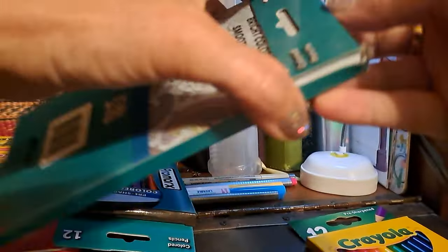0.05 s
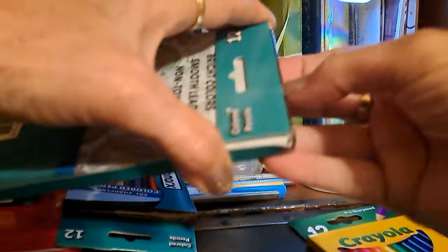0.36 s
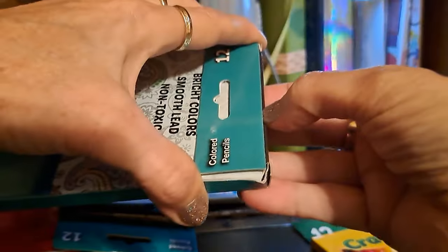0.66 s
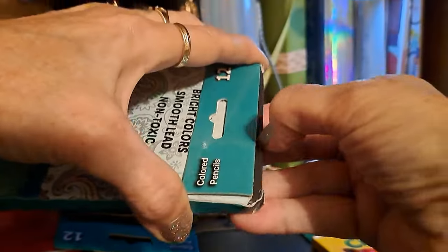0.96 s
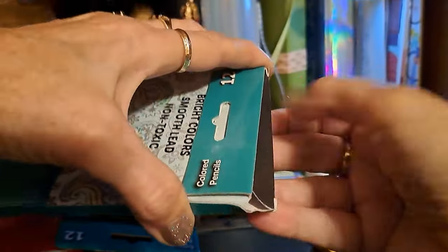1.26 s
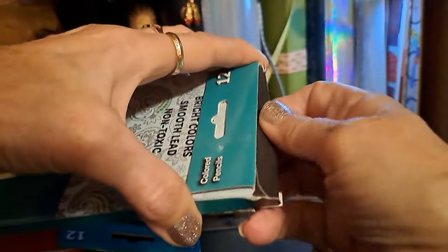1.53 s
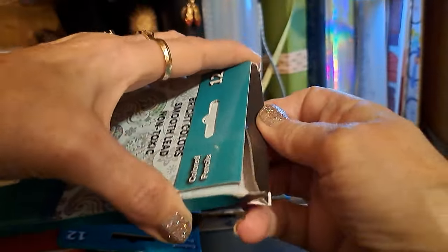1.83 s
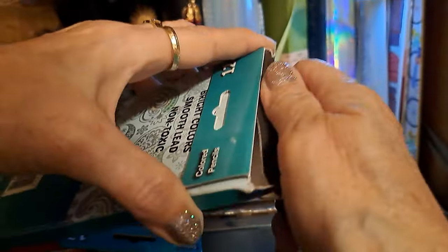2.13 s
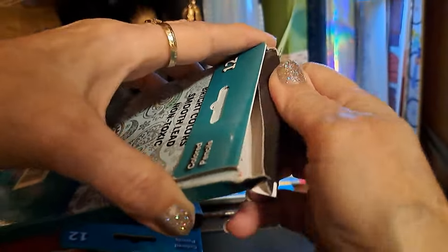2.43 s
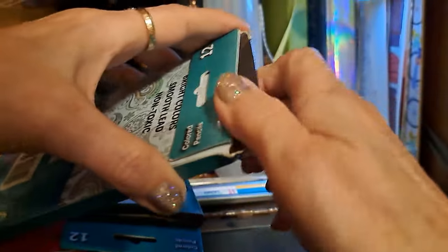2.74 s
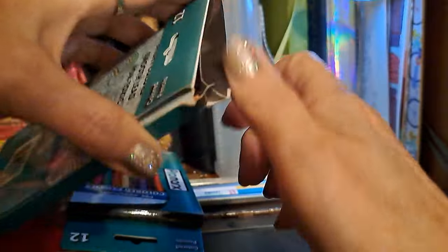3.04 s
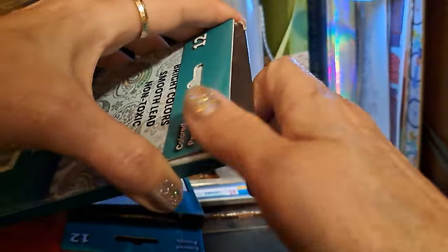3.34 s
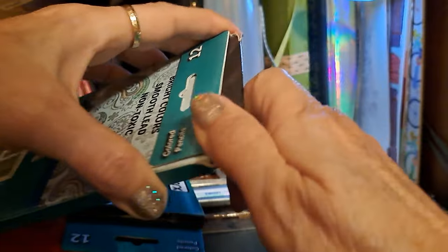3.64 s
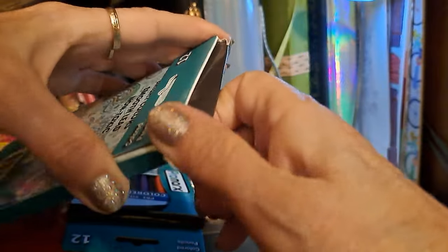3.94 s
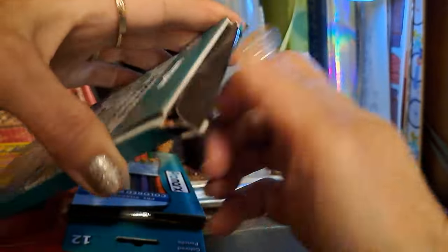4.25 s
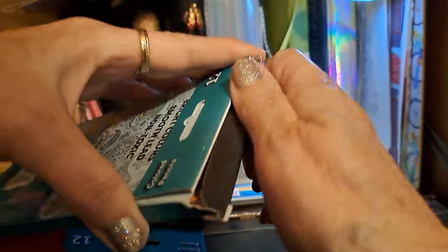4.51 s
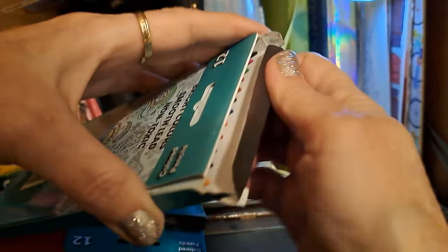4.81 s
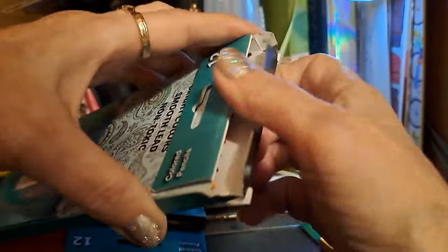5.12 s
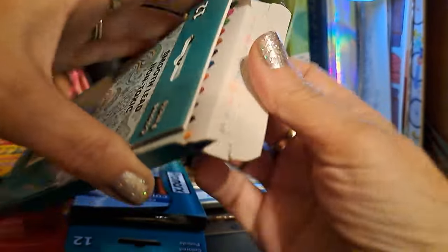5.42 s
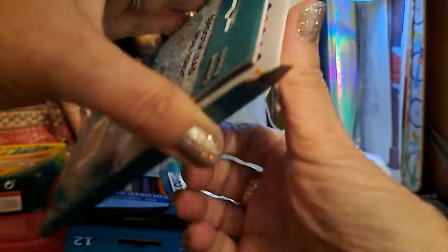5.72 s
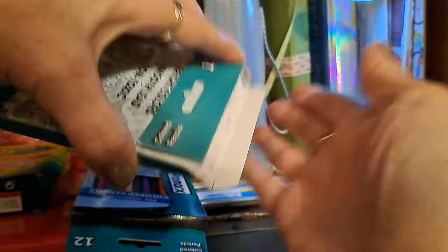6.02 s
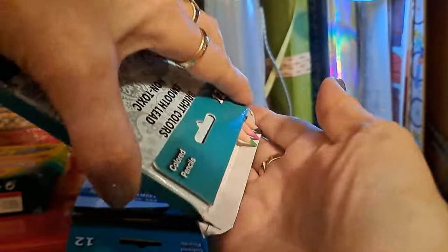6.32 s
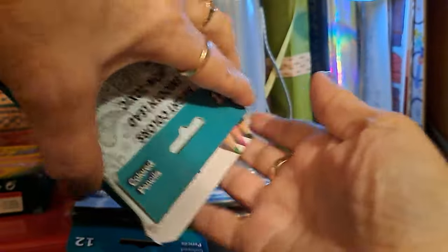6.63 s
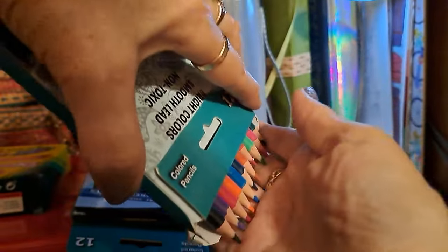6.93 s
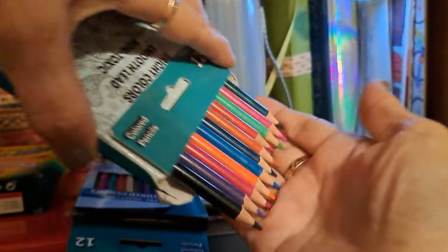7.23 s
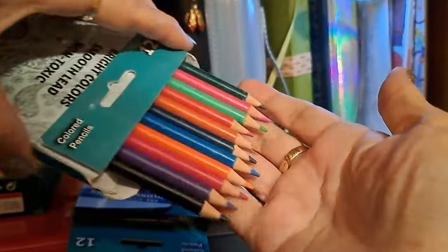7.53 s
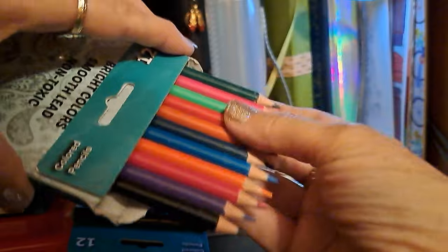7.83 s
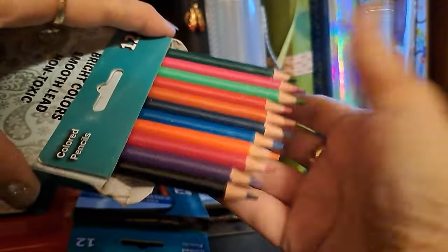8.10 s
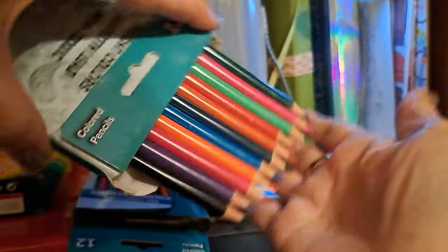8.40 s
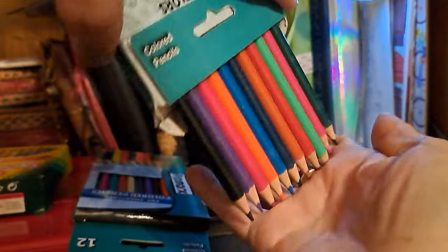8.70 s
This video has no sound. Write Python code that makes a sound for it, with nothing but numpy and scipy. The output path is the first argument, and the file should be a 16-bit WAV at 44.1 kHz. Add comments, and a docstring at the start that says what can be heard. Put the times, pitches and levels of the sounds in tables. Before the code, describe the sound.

In a small, quiet room with a faint mains hum, a thin cardboard box is handled right by the microphone. The card rubs, snaps and thuds softly under the fingers in short, irregular bursts while the flap is pried open. After about six seconds, wooden pencils glide out of the box with a longer, smoother scraping, ending in a few light ticks and bumps.

```python
"""A thin cardboard box, picked open at the end flap close to the microphone; coloured pencils slide out.
Card rubs as fibres catch and release, snaps as patches let go, and thuds under the fingers.
Skin murmurs and squeaks on the print. Pencils scrape along the inside and tick against each other.
Rubs, scrapes and snaps ring the box modes. Small, quiet room with faint mains hum."""
import sys
import numpy as np
from scipy import signal
from scipy.fft import rfft, irfft
from scipy.io import wavfile
from scipy.ndimage import uniform_filter1d

SR = 44100
rng = np.random.default_rng(int(sys.argv[2]) if len(sys.argv) > 2 else 0)


def master(y):
    """Save y as 16-bit WAV."""
    cut = np.clip(np.atleast_2d(y).T, -1, 1)
    pcm = np.round(cut * 32767)  # scale
    wavfile.write(sys.argv[1], SR, pcm.astype(np.int16))


N = 386404
TIME_S = np.arange(N) / SR

# Room air spectrum: (frequency [Hz], gain [dB])
AIR_SPECTRUM = [(20, -27), (35, -6.5), (55, -2.5), (88, -8), (120, -5.5), (170, -10), (240, -13.5),
                (295, -7.5), (380, -21.5), (600, -29), (3000, -35.5), (5000, -39.5), (7500, -34.5),
                (10000, -39), (15000, -33.5)]
# Grip friction envelope: (time [s], level [dB])
GRIP_LEVELS = [(0, -73), (.6, -89), (2.1, -80), (2.4, -59.5), (2.7, -61.5), (2.95, -54.5), (3.15, -74),
               (3.8, -81.5), (4.62, -73.5), (7.3, -72), (8.2, -82.5), (8.76, -74.5)]
# Grip friction spectrum: (frequency [Hz], gain [dB])
GRIP_SPECTRUM = [(100, -18.5), (230, -1.5), (330, 2), (430, 0), (560, -17.5), (900, -32), (2500, -48.5)]
# Finger and flap strokes: (full-speed time [s], rise [s], hold [s], fall [s], relative mid level [dB],
# body re mid [dB], hiss re mid [dB], pinned resonance [Hz], its boost [dB])
CARD_STROKES = [(0.096, 0.13, 0, 0.34, -72.5, -5, -2.5, 1100, 18),
                (0.507, 0.014, 0, 0.049, -70.5, -5, 5, 5300, 7),
                (0.66, 0.087, 0.043, 0.098, -71.5, -5, 0, 2700, 15),
                (1.093, 0.036, 0, 0.1, -36, -10.5, 1.5, 2880, 7),
                (1.137, 0.031, 0.00047, 0.038, -42.5, 4.5, 2, 3670, 16),
                (1.246, 0.071, 0.0083, 0.059, -62.5, -2, -7, 1334, 9),
                (1.459, 0.076, 0.0, 0.17, -53.5, -5.5, 0, 1500, 0),
                (1.573, 0.1, 0.099, 0.22, -65, -8.5, 1.5, 3530, 8.5),
                (1.906, 0.037, 0.055, 0.073, -74, -12.5, 5.5, 2400, 14.5),
                (2.051, 0.018, 0.0079, 0.067, -75, -6, 12.5, 2380, 2),
                (2.168, 0.072, 0.14, 0.11, -64, -18.5, 0, 6100, 7.5),
                (2.408, 0.081, 0, 0.051, -46.5, -5.5, -5, 1196, 7.5),
                (2.578, 0.07, 0.0025, 0.019, -46, 1, 0, 4700, 7),
                (2.605, 0.09, 0.051, 0.13, -62.5, -7, 2, 7050, 4),
                (2.829, 0.06, 0.0, 0.071, -45, -10, -1, 2780, 15),
                (2.89, 0.013, 0.018, 0.024, -36, 4.5, -4, 2450, 13),
                (2.942, 0.047, 0.037, 0.061, -55.5, -13, 0, 1660, -7),
                (3.056, 0.017, 0.044, 0.027, -47, -3, -3.5, 2200, 12),
                (3.263, 0.016, 0.11, 0.079, -74.5, -16.5, 6.5, 5090, 7),
                (3.425, 0.04, 0.0098, 0.071, -50, -22, -1, 2420, 10.5),
                (3.589, 0.02, 0.0, 0.067, -61.5, -13, -0.5, 2470, 8),
                (3.684, 0.021, 0.012, 0.062, -48.5, -0.5, -5, 2460, 4),
                (3.744, 0.021, 0.041, 0.2, -63.5, -12, 5.5, 4100, 6.5),
                (4.082, 0.0076, 0.061, 0.015, -41.5, -9.5, -3.5, 2690, 14),
                (4.212, 0.043, 0.0, 0.082, -49, -10.5, -1, 2310, 7),
                (4.475, 0.021, 0.0089, 0.035, -55, -22, -2, 1950, 9),
                (4.521, 0.013, 0.028, 0.061, -42.5, -12, -2, 2470, 4),
                (4.644, 0.017, 0.0051, 0.04, -55, -4, -20, 1420, 11),
                (4.802, 0.066, 0, 0.027, -37.5, -7, -9, 880, 6),
                (4.825, 0.19, 0.052, 0.068, -47.5, -10.5, 5.5, 4660, 9),
                (4.983, 0.11, 0.051, 0.093, -66.5, -1, -1.5, 3960, 7.5),
                (5.116, 0.02, 0.0098, 0.091, -67.5, -6.5, 4, 3760, 11.5),
                (5.195, 0.015, 0.02, 0.033, -38.5, -4.5, -4.5, 4100, 1.5),
                (5.309, 0.14, 0.021, 0.056, -61.5, -6.5, -1, 1380, 16),
                (5.379, 0.0089, 0.09, 0.12, -57.5, -5.5, -8, 1500, 18.5),
                (5.648, 0.12, 0.012, 0.1, -70.5, -7, 7, 4310, -0.5),
                (5.886, 0.026, 0.0, 0.069, -65, -8, 3, 3580, 9.5)]
# Card spectrum: (frequency [Hz], gain [dB])
CARD_SPECTRUM = [(150, -12), (300, -6.5), (700, -7), (1000, -7), (1200, -5.5), (1500, 6.5), (2500, -1),
                 (4500, -5), (6500, -6), (7800, -6.5), (8500, -14.5), (10000, -14.5), (12500, -8.5),
                 (16000, -18)]
# Panel and cavity modes: (frequency [Hz], bandwidth [Hz], relative gain [dB])
BOX_RESONANCES = [(487, 17, -2.5), (603, 17, -3.5), (820, 130, 3), (909.3, 68, 7), (1410, 28, -4.5),
                  (1670, 19, -13), (1980.4, 210, 4), (2320, 120, -3.5), (2770, 17, -4.5), (3223, 12, -5),
                  (3840, 30, -2), (4078, 28, -3.5), (4480, 86, -1), (7500, 73, -1.5)]
# Body, mid and hiss bands: (low edge [Hz], high edge [Hz])
BANDS_HZ = [(300, 1100), (1100, 3200), (3200, 17000)]
# Skin squeaks: (start [s], end [s], pitch [Hz], level [dB])
SKIN_SQUEAKS = [(0.049, 0.39, 1110, -78), (1.544, 1.775, 957, -71.5), (1.616, 1.827, 1420, -72),
                (4.822, 4.935, 3960, -51.5), (5.281, 5.344, 5580, -69), (5.358, 5.56, 1880, -75)]
# Card snaps, pencil ticks: (time [s], relative mid level [dB], body re mid [dB], hiss re mid [dB],
# pitch [Hz])
SNAP_EVENTS = [(0.389, -75, -10, 3, 3000), (1.0708, -45.5, -23, -18, 2800), (1.1324, -14, -3.5, -2, 944),
               (1.388, -59.5, -24.5, 1.5, 1970), (1.422, -49, -13, -3, 1540),
               (1.4485, -34.5, -7.5, 2, 3060), (1.5191, -45, -5, -0.5, 2420),
               (1.5997, -58.5, -1.5, 7.5, 6350), (2.102, -60.5, -9, -2.5, 2000),
               (2.1466, -59, -20.5, 3, 2500), (2.5183, -44.5, -3.5, 6, 3930),
               (2.5621, -44.5, -10.5, 11.5, 5230), (2.5703, -47, -14, 21, 4580),
               (2.8176, -37.5, -3, 1, 2890), (2.8891, -26.5, -30, 5.5, 2250), (2.947, -37, -7, -14, 1610),
               (2.9969, -37, 0, -14, 980), (3.052, -42.5, -4, -11, 2100), (3.4787, -54.5, -11, -17, 1630),
               (3.675, -51, -3.5, -3, 1630), (3.7008, -36, -7, -1.5, 3340), (3.708, -37, -4.5, 0.5, 2400),
               (3.9821, -54, -0.5, -5.5, 1510), (4.077, -47, -14, -6, 1600), (4.1448, -41, -2, 2, 2620),
               (4.2219, -40, -6, -1, 2260), (4.353, -60.5, -11.5, -15, 1900), (4.408, -54.5, -17, -9, 1700),
               (4.4755, -31.5, -21.5, 1, 1910), (4.5171, -37.5, -14, -1.5, 1840),
               (4.7829, -39, -8, 5, 5130), (4.7906, -35.5, -0.5, -1, 930), (4.9707, -33.5, -23, 4, 3970),
               (5.0454, -59, -0.5, -0.5, 4100), (5.1727, -38.5, 2.5, 10, 4080),
               (5.1867, -40.5, -13, 7.5, 5450), (5.1924, -40, -27, 5.5, 5720), (5.2007, -36, -1, 3, 874),
               (5.2231, -35.5, -7, 1, 4020), (5.547, -68, -15, 11, 5190), (5.8871, -54.5, -16.5, 3.5, 4530),
               (6.209, -38.5, -8, 6, 5950), (6.2343, -36, -20, -5.5, 1400), (6.2455, -46, -5, -11, 1540),
               (6.2735, -41, -12.5, -3.5, 2370), (6.7165, -38, -9.5, -4.5, 2495),
               (7.5352, -50, -25, -15, 1792), (7.7352, -61.5, -11.5, 0, 8000),
               (7.8447, -50, -25.5, -10.5, 1620), (7.9641, -42, -17, 0.5, 2060),
               (8.0403, -47.5, -18, -14, 1865), (8.5242, -38.5, -16, -3.5, 1842),
               (8.5792, -41, -15, -8, 1880), (8.7425, -46, -27, -3.5, 2730)]
# Modes of a released patch of card: (frequency re pitch [ratio], gain [linear])
PATCH_MODES = [(0.51, 0.15), (1, 0.39), (1.55, 0.19)]
# Finger and pencil bumps on the box: (time [s], peak level [dB], pitch [Hz])
BOX_BUMPS = [(0.664, -55, 163), (1.129, -33, 231), (1.137, -43.5, 139.5), (1.139, -42, 54.3),
             (1.448, -42.5, 222.6), (1.451, -47.5, 150), (2.000, -60.5, 135), (2.182, -44.5, 305),
             (2.306, -44.5, 316), (2.52, -49, 137), (2.561, -45.5, 127), (2.821, -36, 132),
             (2.886, -44, 84.4), (2.891, -32.5, 454), (2.983, -36.5, 132.2), (3.933, -41.5, 442),
             (3.945, -52, 133.4), (4.585, -43.5, 434), (4.595, -49.5, 136), (4.811, -38.5, 132),
             (4.976, -53, 162), (5.228, -48.5, 127.6), (5.377, -50, 387), (5.592, -40.5, 142),
             (6.172, -41.5, 119), (6.178, -50, 286), (6.206, -44.5, 125), (6.599, -48.5, 57.4),
             (6.718, -46, 199), (8.522, -48, 227), (8.577, -50.5, 143)]
# Bump swell, most cycles near the low box resonance: (pitch [Hz], rise to peak [cycles])
BUMP_RISE = [(55, .6), (135, 1.3), (230, 0.9), (450, .8)]
# Pencil strokes: columns as CARD_STROKES
PENCIL_STROKES = [(6.179, 0.031, 0.025, 0.12, -45, -7.5, 0.5, 1390, 8),
                  (6.349, 0.073, 0.022, 0.015, -55, -12, -1, 2300, 9),
                  (6.454, 0.061, 0.015, 0.033, -58.5, -12, -1.5, 2440, 11),
                  (6.519, 0.04, 0.0062, 0.011, -50, -16.5, 0, 4770, 8),
                  (6.603, 0.0067, 0, 0.023, -57.5, -14, -1, 1490, -8),
                  (6.676, 0.07, 0.015, 0.051, -56.5, -4.5, 4.5, 2460, 1),
                  (6.721, 0.024, 0.01, 0.045, -42, -6.5, -3, 2500, 6),
                  (6.851, 0.092, 0.033, 0.068, -35, -15.5, -2, 1500, 0.5),
                  (7.054, 0.047, 0.15, 0.11, -47.5, -19.5, 1, 1970, 9),
                  (7.285, 0.22, 0.043, 0.074, -42.5, -23, -3, 1710, 8.5),
                  (7.506, 0.053, 0.034, 0.043, -53.5, -18, -7.5, 1704, 14.5),
                  (7.909, 0.061, 0.094, 0.054, -48.5, -15.5, -4, 1996, 9.5),
                  (8.518, 0.062, 0.022, 0.012, -48.5, -23, 0.5, 1813, 10.5),
                  (8.565, 0.011, 0.0, 0.046, -51, -3, 2.5, 1626, 2),
                  (8.769, 0.082, 0, 0.05, -55.5, -13, 1, 1105, 10.5)]
# Pencil-on-card spectrum: (frequency [Hz], gain [dB])
PENCIL_SPECTRUM = [(180, -32), (300, -15.5), (519, -21.5), (656, -20), (814, -13.5), (1120, -13),
                   (1320, -3.5), (2100, -1.5), (2700, -6.5), (3290, -9), (6850, -13.5), (7690, -12),
                   (8640, -20.5), (12700, -17.5), (16000, -26.5)]
# Left microphone port response: (frequency [Hz], gain [dB])
LEFT_PORT_RESPONSE = [(1000, 0), (5000, 1), (8500, -0.5), (16000, -5)]


def from_db(db):
    """Decibels to gain."""
    return 10 ** (np.asarray(db) / 20)


def unit_rms(x):
    """Scale to unit power."""
    return x / np.sqrt(np.mean(x ** 2) + 1e-20)


def wander(rows, length, step_samples):
    """Random piecewise-linear curves, unit deviation."""
    knots = rng.standard_normal((rows, length // step_samples + 2))
    position = np.arange(length) / step_samples
    return np.array([np.interp(position, np.arange(len(k)), k) for k in knots]) * np.sqrt(3 / 2)


def highpass(x, hz):
    """First-order high-pass."""
    return signal.sosfilt(signal.butter(1, hz, "high", fs=SR, output="sos"), x)


def resonance(x, hz, width_hz):
    """Two-pole resonator, unity peak gain."""
    radius = np.exp(-np.pi * width_hz / SR)
    feedback = [1, -2 * radius * np.cos(2 * np.pi * hz / SR), radius ** 2]
    return (1 - radius ** 2) / 2 * signal.lfilter([1, 0, -1], feedback, x + 1e-18)


def band_noise(white, hz, width_hz):
    """Noise through two equal resonators, unit power."""
    return unit_rms(resonance(resonance(white, hz, width_hz), hz, width_hz))


def coloured(x, spectrum, size=8192):
    """Minimum-phase filter following a spectrum."""
    hz, db = np.transpose(spectrum)
    grid_hz = np.maximum(np.arange(size // 2 + 1) * SR / size, 1)
    gain = from_db(np.interp(np.log(grid_hz), np.log(hz), db))
    cepstrum = irfft(np.log(gain))
    cepstrum[1:size // 2] *= 2
    cepstrum[size // 2 + 1:] = 0
    impulse = irfft(np.exp(rfft(cepstrum)))[:min(size // 2, x.shape[-1])]
    return signal.fftconvolve(x, np.array(impulse, ndmin=x.ndim), axes=-1)[..., :x.shape[-1]]


def split_bands(x):
    """Hollow body, papery mid, hiss."""
    return [signal.sosfilt(signal.butter(3, edges, "band", fs=SR, output="sos"), x) for edges in BANDS_HZ]


def stereo(mid, side, spread, lag_ms):
    """Mid/side to left/right; positive lag delays the left."""
    ports = np.array([mid + spread * side, mid - spread * side])
    shift = round(abs(lag_ms) * SR / 1000)
    late = 0 if lag_ms > 0 else 1
    ports[late] = np.roll(ports[late], shift, axis=-1)
    ports[late, ..., :shift] = 0
    return ports


def pan(x, left_db):
    """Constant-power pan; left_db is left re right."""
    gains = from_db([[left_db / 2], [-left_db / 2]])
    return x * gains / np.sqrt(np.mean(gains ** 2))


def soft_noise(spectrum, bass_spread, treble_spread):
    """Smooth stereo noise, wider in the treble."""
    mid, side = rng.standard_normal((2, N))
    side = bass_spread * side + treble_spread * highpass(side, 1500)
    return unit_rms(coloured(stereo(mid, side, spread=1, lag_ms=0), spectrum))


def mains_hum(hz=120, steady_db=-65, waver_db=-66, wavers_per_s=10):
    """Wavering tone at twice the mains frequency."""
    swell, sway = from_db(waver_db) * wander(2, N, SR // wavers_per_s)
    phase = 2 * np.pi * hz * TIME_S
    hum = (np.sqrt(2) * from_db(steady_db) + swell) * np.sin(phase) + sway * np.cos(phase)
    return stereo(hum, 0, spread=0, lag_ms=0.36)


def room_air(level_db=-69.5):
    """Still air: steady low noise."""
    return from_db(level_db) * soft_noise(AIR_SPECTRUM, bass_spread=0.28, treble_spread=0.44)


def grip():
    """Skin creeps on the box: dull friction murmur."""
    level_db = np.interp(TIME_S, *np.transpose(GRIP_LEVELS))
    return from_db(level_db) * soft_noise(GRIP_SPECTRUM, bass_spread=0.46, treble_spread=0.3)


def friction(catches_per_s, size_db, smooth_gain, spread, lag_ms, decay_s=0.00044):
    """Fibres catch and release at random: short bursts over smooth hiss."""
    catches = rng.random(N) < catches_per_s / SR
    sizes = from_db(size_db * np.minimum(rng.exponential(1, N), 2.8))
    bursts = unit_rms(signal.lfilter([1], [1, -np.exp(-1 / (decay_s * SR))], catches * sizes + 1e-18))
    mid, side = rng.standard_normal((2, N)) * np.hypot(bursts, smooth_gain)
    return stereo(mid, highpass(side, 1300), spread, lag_ms)


def box_ring(x, ring_db):
    """Panels and enclosed air add their resonances."""
    return x + sum(from_db(db + ring_db) * resonance(x, hz, width) for hz, width, db in BOX_RESONANCES)


def stroke_db(time_s, at_s, rise_s, hold_s, fall_s, depth_db=24.5):
    """Hand speeds up, glides, slows: level re full speed."""
    before = np.maximum((at_s - time_s) / rise_s, 0)
    after = np.maximum((time_s - at_s - hold_s) / fall_s, 0)
    return -depth_db * (before + after) ** 1.15  # rounded shoulders


def stroked(texture, strokes, judder_db, pin_q=8.9):
    """Speed and hand judder set level; pressure and contact point set body, hiss and pinned resonance."""
    out = np.zeros((2, N))
    shake_db = judder_db * wander(1, N, step_samples=450)[0]
    for at_s, rise_s, hold_s, fall_s, level_db, body_db, hiss_db, pin_hz, boost_db in strokes:
        span = slice(max(0, int((at_s - 2 * rise_s) * SR)), int((at_s + hold_s + 2 * fall_s) * SR))
        pinned = (from_db(boost_db) - 1) * resonance(texture[:, span], pin_hz, pin_hz / pin_q)
        envelope_db = level_db + stroke_db(TIME_S[span], at_s, rise_s, hold_s, fall_s) + shake_db[span]
        for band, band_db in zip(split_bands(texture[:, span] + pinned), (body_db, 0, hiss_db)):
            power = uniform_filter1d(np.mean(band ** 2, axis=0), size=3000)
            out[:, span] += band / np.sqrt(power + 1e-12) * from_db(envelope_db + band_db)
    return out


def card_rub(gain_db=-1.62):
    """Fingertips and flap drag over card in uneven catches."""
    grains = friction(catches_per_s=1000, size_db=3.5, smooth_gain=0.98, spread=1, lag_ms=0.11)
    texture = coloured(box_ring(grains, ring_db=-6), CARD_SPECTRUM)
    return from_db(gain_db) * pan(stroked(texture, CARD_STROKES, judder_db=2.5), left_db=0.95)


def squeaks(q=7.3):
    """Skin stick-slip on glossy print: narrow, fluttering tone."""
    out = np.zeros(N)
    for start_s, end_s, hz, level_db in SKIN_SQUEAKS:
        start, end = int(start_s * SR), int(end_s * SR)
        tone = band_noise(rng.standard_normal(end - start), hz, hz / q)
        out[start:end] += from_db(level_db) * tone * signal.windows.tukey(len(tone), 0.6)
    return pan(out, left_db=5.3)


def crinkles(count=28, over_rub_db=3, body_db=-12.5, hiss_db=2, low_hz=1600, high_hz=6000):
    """Faint random ticks of handled card, stronger during rubs; rows as SNAP_EVENTS."""
    when, tone = rng.random((count, 2)).T
    time_s = when * TIME_S[-1]
    rubs_db = [db + stroke_db(time_s, at_s, rise_s, hold_s, fall_s)
               for at_s, rise_s, hold_s, fall_s, db, *_ in CARD_STROKES]
    level_db = np.clip(np.max(rubs_db, axis=0) + over_rub_db, -82, -57.5)
    pitch_hz = low_hz * (high_hz / low_hz) ** tone
    return np.column_stack([time_s, level_db, np.full(count, body_db), np.full(count, hiss_db), pitch_hz])


def bending_pulses(events, length, travel_s=0.0007, scatter_rad=0.99, lag_ms=0.091):
    """Card jumps: flat spectrum, each frequency with its own delay to each port."""
    hz = np.arange(length // 2 + 1) * SR / length
    delay_s = travel_s * (np.abs(wander(events, len(hz), step_samples=50)) + 0.35)
    phase = 2 * np.pi * np.cumsum(delay_s, axis=1) * SR / length
    side_phase = scatter_rad * wander(events, len(hz), step_samples=60) * hz / (hz + 3000)
    side_phase += np.pi * hz * lag_ms / 1000
    pulses = irfft(np.exp(-1j * np.array([phase + side_phase, phase - side_phase])), length)
    return pulses * (np.arange(length) < length // 2)


def panel_flutter(events, length, gain=0.12, rise_s=0.00057, decay_s=0.0038):
    """Released panel flutters: brief noise burst."""
    age_s = np.arange(length) / SR
    envelope = gain * np.exp(-age_s / decay_s) * (1 - np.exp(-age_s / rise_s))
    bursts = rng.standard_normal((events, 2, length)) * envelope
    mid, side = highpass(bursts, 920).transpose(1, 0, 2)
    return stereo(mid, highpass(side, 750), spread=0.86, lag_ms=0.12)


def patch_ring(crack, hz, q=9, boost_db=17):
    """Released patch rings at its own pitch, with a weaker mode either side."""
    modes = sum(gain * resonance(crack, min(ratio * hz, SR / 3), hz / q) for ratio, gain in PATCH_MODES)
    return (from_db(boost_db) - 1) * modes


def snaps(length=3000, attack_s=0.006):
    """Card snaps and pencil ticks: crack plus flutter, ringing in patch and box."""
    time_s, level_db, body_db, hiss_db, pitch_hz = np.vstack([SNAP_EVENTS, crinkles()]).T
    cracks = bending_pulses(len(time_s), length) + panel_flutter(len(time_s), length)
    patches = np.stack([patch_ring(cracks[:, k], hz) for k, hz in enumerate(pitch_hz)], axis=1)
    ringing = coloured(box_ring(cracks, ring_db=3) + patches, CARD_SPECTRUM)
    hits = 0
    for band, band_db in zip(split_bands(ringing), (body_db - 1, -0.3, hiss_db - 0.2)):
        attack_rms = np.sqrt(np.mean(band[..., :round(attack_s * SR)] ** 2, axis=(0, 2)))
        hits += band * (from_db(level_db + band_db) / attack_rms)[:, None]
    out = np.zeros((2, N + length))
    for k, start in enumerate((time_s * SR).astype(int)):
        out[:, start:start + length] += hits[:, k]
    return pan(out[:, :N], left_db=1.7)


def bumps(length=7000, thud_db=-14.5, thud_ratio=1.6, waver_rad=0.25):
    """Soft pushes move the whole box: a few low cycles swell and die, with a dull thud."""
    out = np.zeros(N + length)
    age_s = np.arange(length) / SR
    wavers = wander(len(BOX_BUMPS), length, step_samples=300)
    for (time_s, peak_db, hz), waver in zip(BOX_BUMPS, wavers):
        start, thud_hz = int(time_s * SR), thud_ratio * hz
        swell = age_s * hz / np.interp(hz, *np.transpose(BUMP_RISE))
        thud = from_db(thud_db) * band_noise(rng.standard_normal(length), thud_hz, width_hz=thud_hz)
        tone = np.sin(2 * np.pi * hz * age_s + waver_rad * waver)
        out[start:start + length] += from_db(peak_db) * swell * np.exp(1 - swell) * (tone + thud)
    return out[:N]


def pencil_slide(gain_db=1.3):
    """Lacquered wood glides on card: finer, denser grain."""
    grains = friction(catches_per_s=1100, size_db=-4.5, smooth_gain=1, spread=0.95, lag_ms=-0.09)
    texture = coloured(box_ring(grains, ring_db=-27), PENCIL_SPECTRUM)
    return from_db(gain_db) * pan(stroked(texture, PENCIL_STROKES, judder_db=1.47), left_db=2.9)


def room(x, t60_s=0.099, predelay_s=0.005, wet_db=-16, lowpass_hz=6500, length=14000):
    """Short, dense reflections off desk and crowded shelves."""
    age_s = np.arange(length) / SR
    tail = rng.standard_normal((2, length)) * from_db(-60 * age_s / t60_s) * (age_s > predelay_s)
    tail = signal.sosfilt(signal.butter(1, lowpass_hz, fs=SR, output="sos"), tail)
    tail /= np.linalg.norm(tail, axis=1, keepdims=True)
    return x + from_db(wet_db) * signal.fftconvolve(x, tail, axes=1)[:, :N]


def scene():
    """Handled box in its room."""
    handling = card_rub() + pencil_slide() + snaps() + squeaks() + bumps()
    return room(handling) + grip() + mains_hum() + room_air()


def record(dry):
    """Duller left port, soft clip, steep 16 kHz low-pass."""
    ports = np.tanh([coloured(dry[0], LEFT_PORT_RESPONSE), dry[1]])
    return signal.sosfilt(signal.ellip(10, 0.1, 100, 16000, fs=SR, output="sos"), ports)


dry = scene()
out = record(dry)
master(out)
```